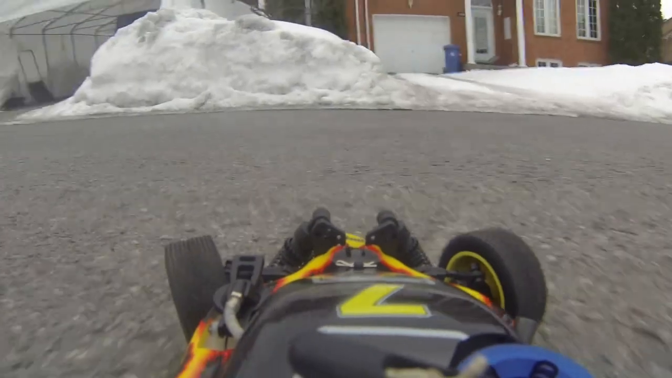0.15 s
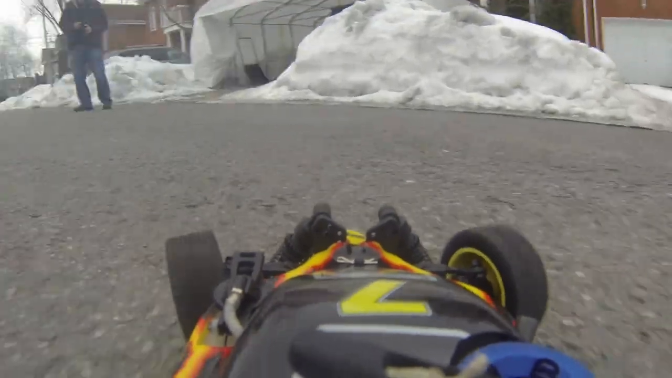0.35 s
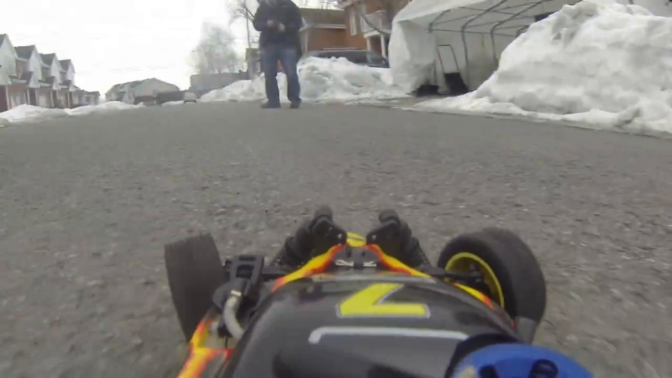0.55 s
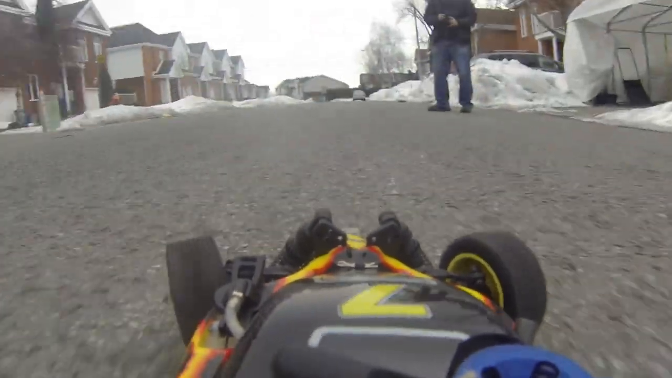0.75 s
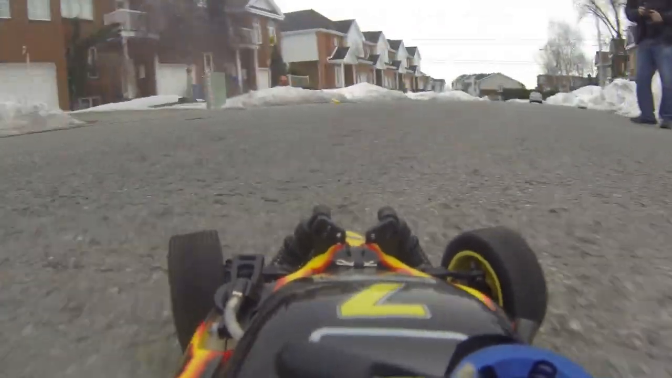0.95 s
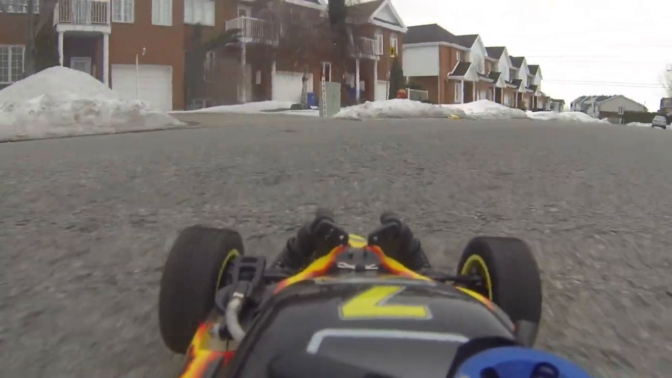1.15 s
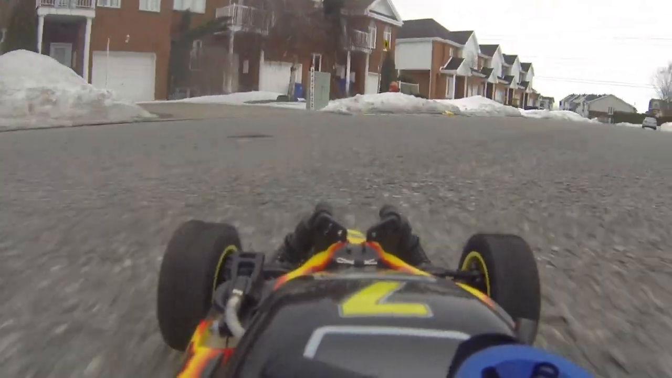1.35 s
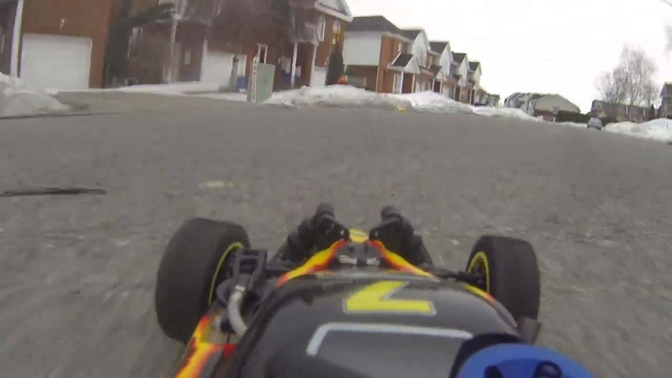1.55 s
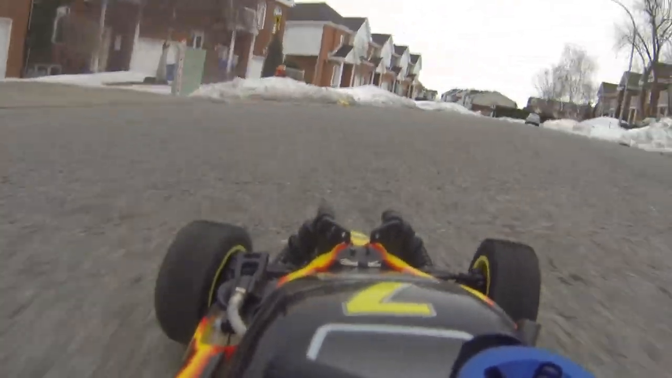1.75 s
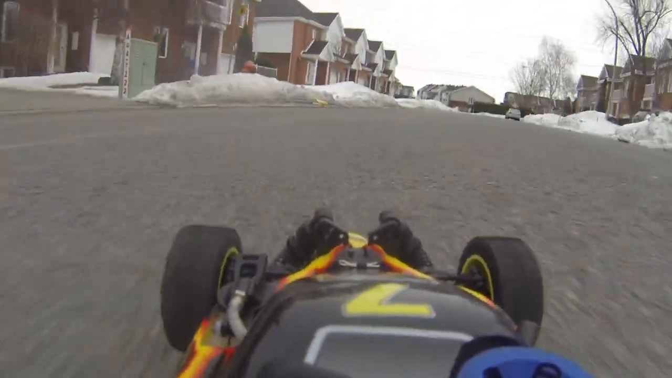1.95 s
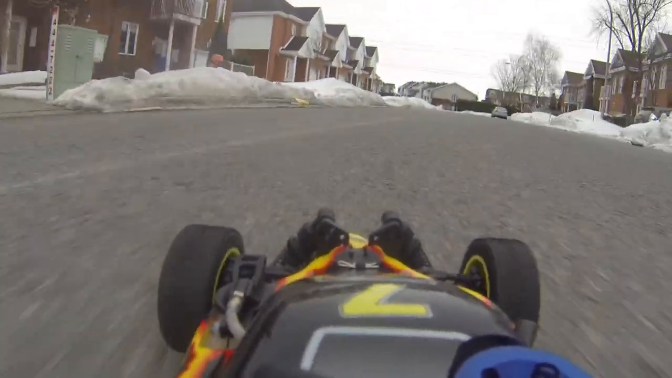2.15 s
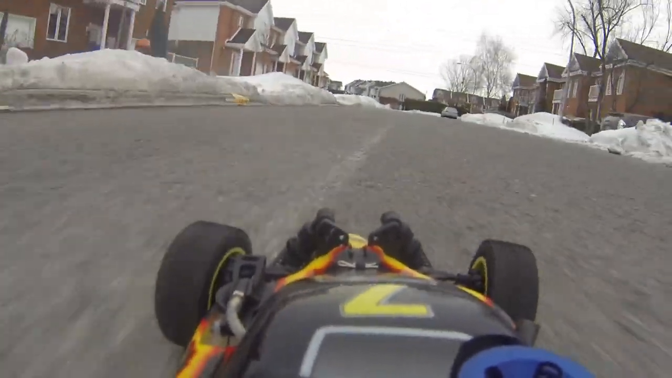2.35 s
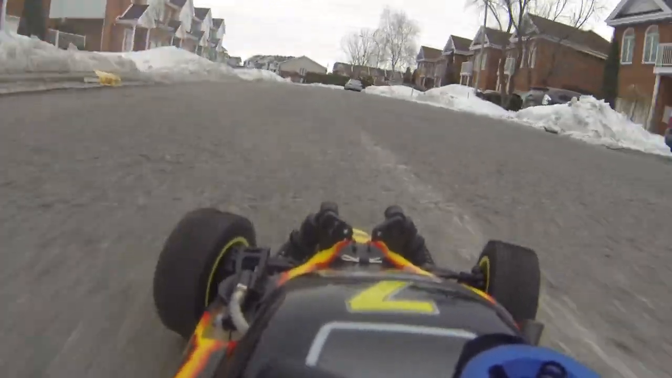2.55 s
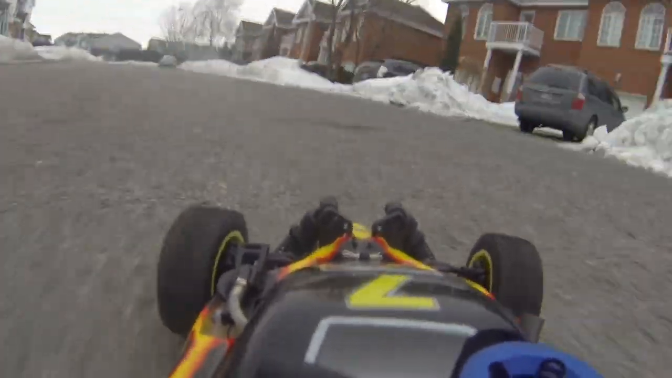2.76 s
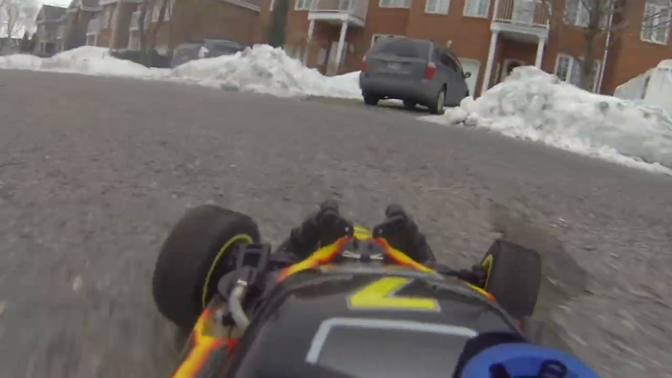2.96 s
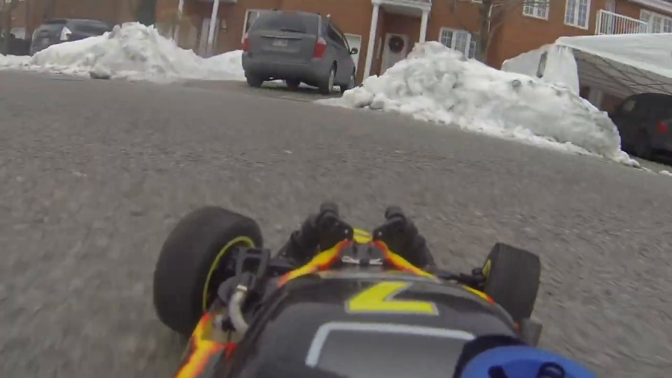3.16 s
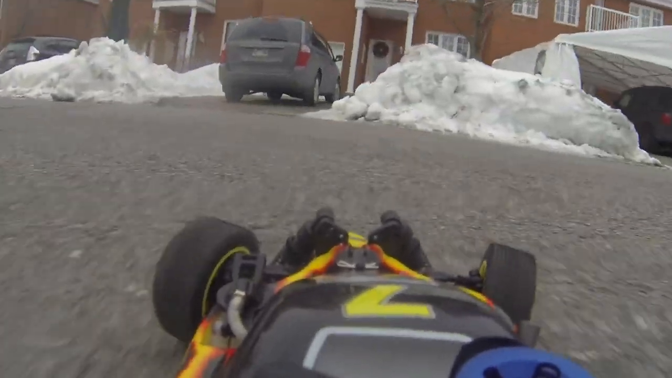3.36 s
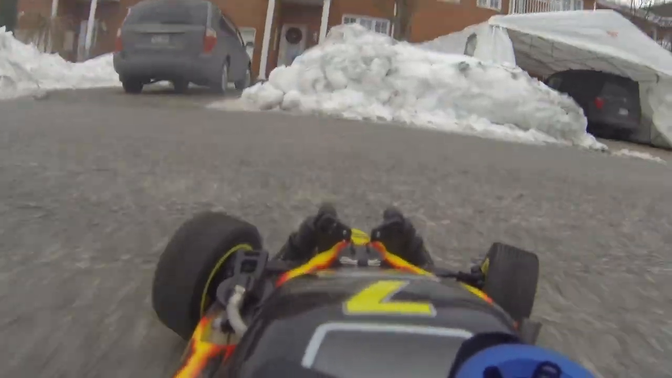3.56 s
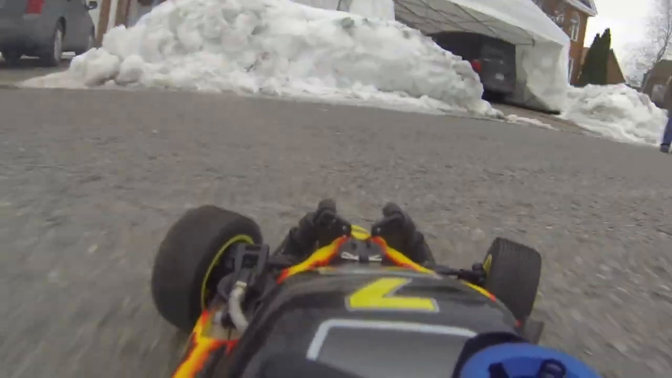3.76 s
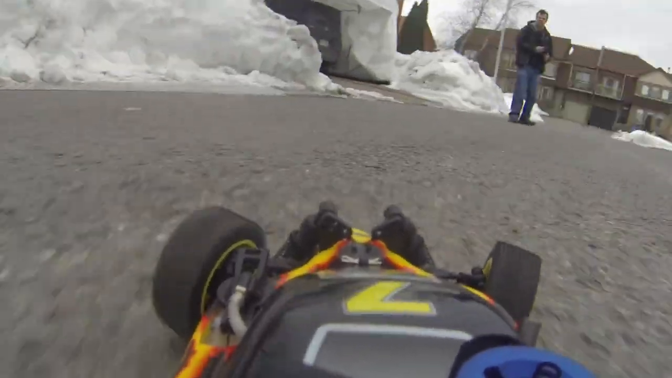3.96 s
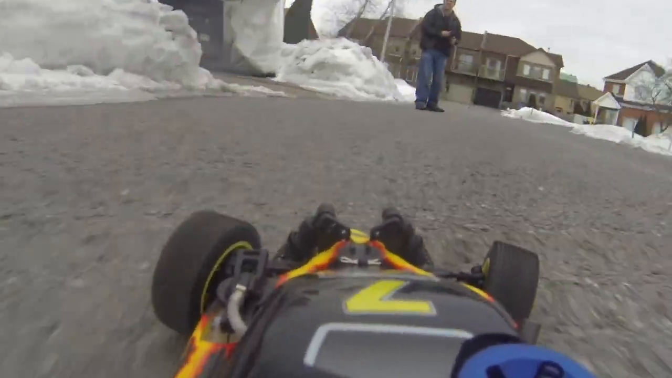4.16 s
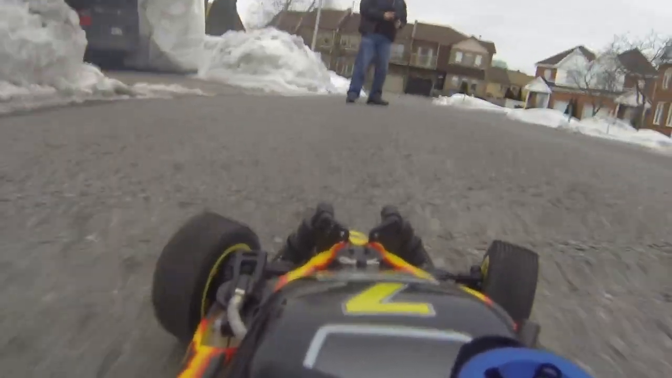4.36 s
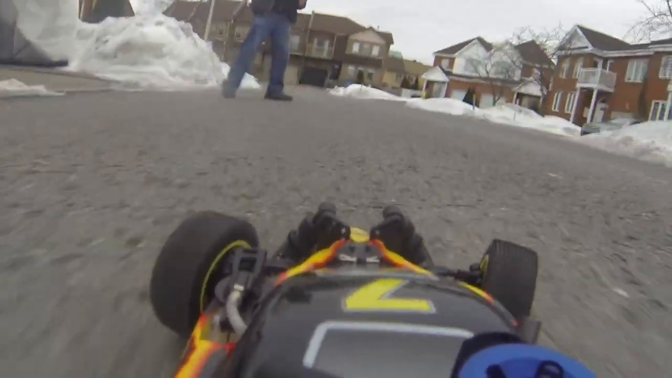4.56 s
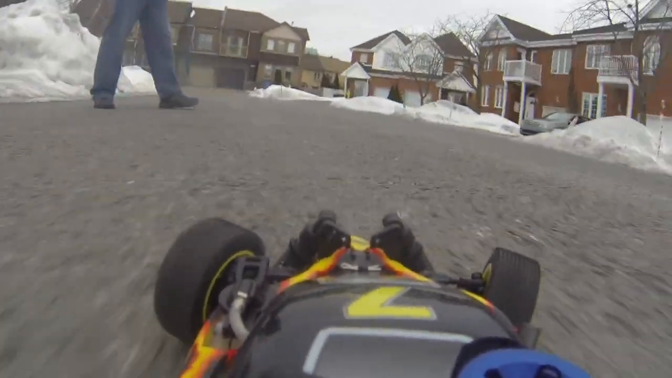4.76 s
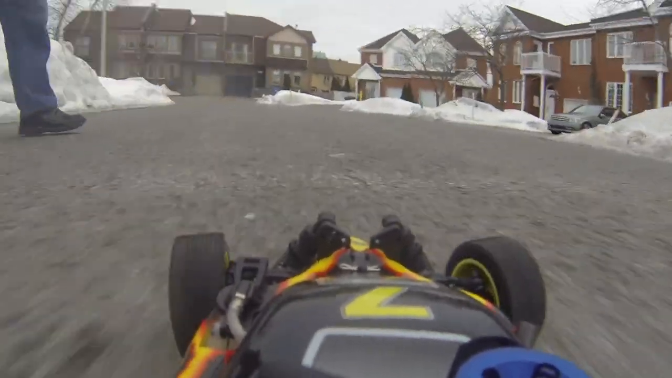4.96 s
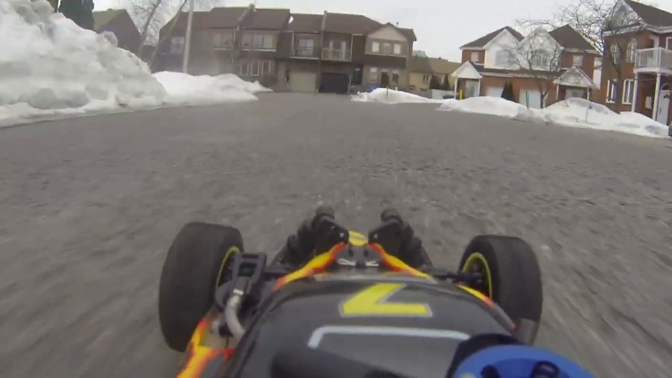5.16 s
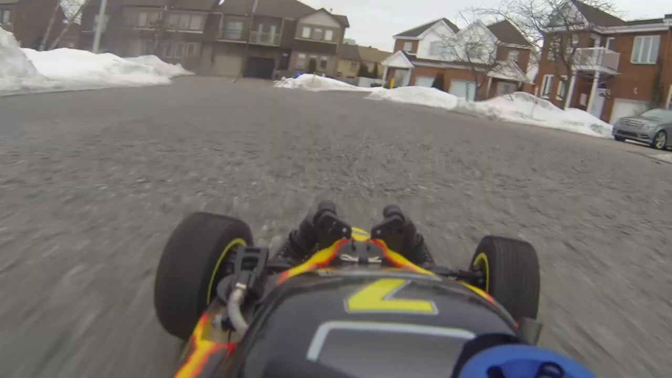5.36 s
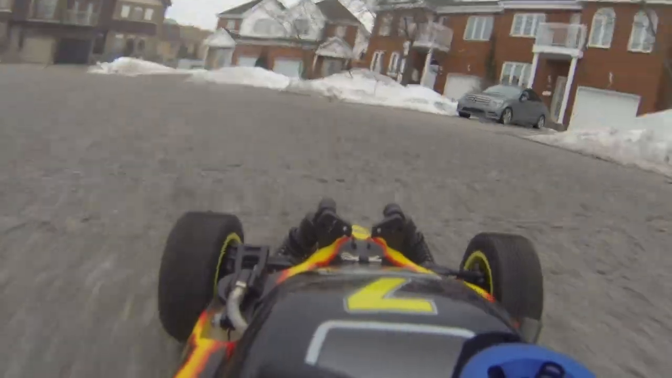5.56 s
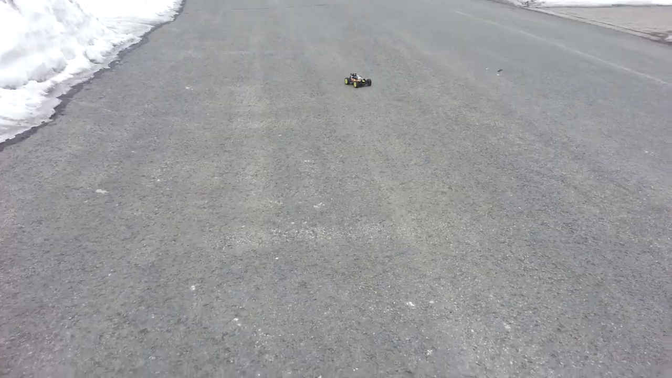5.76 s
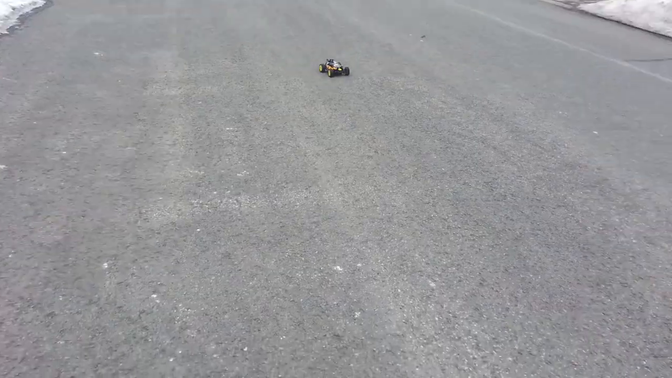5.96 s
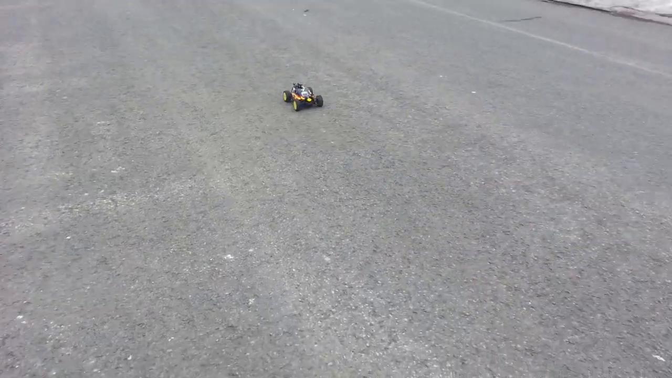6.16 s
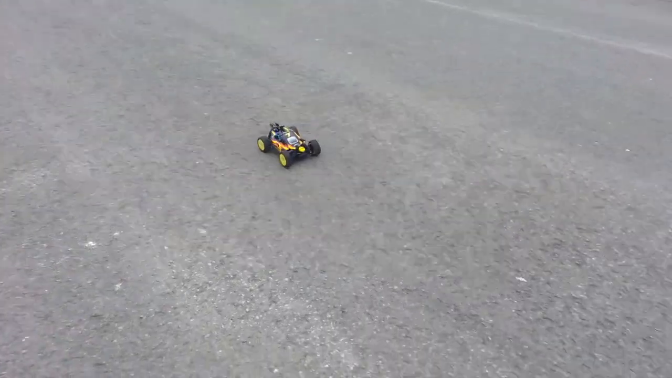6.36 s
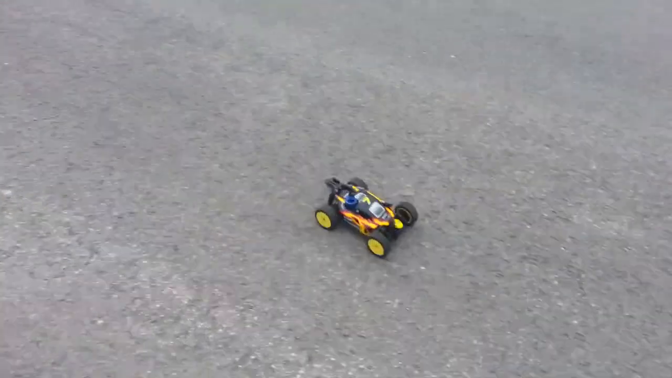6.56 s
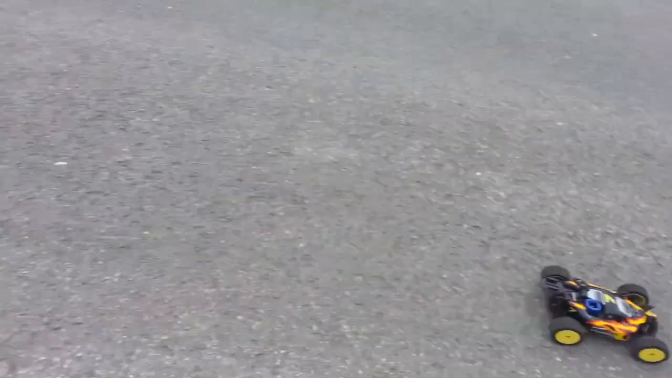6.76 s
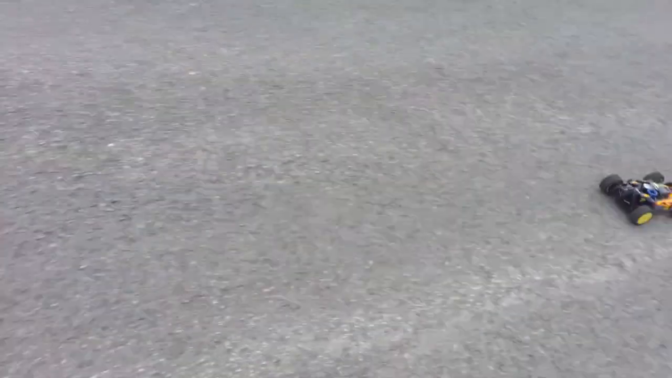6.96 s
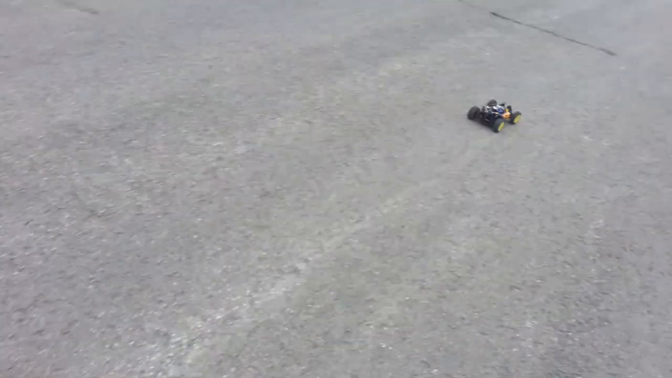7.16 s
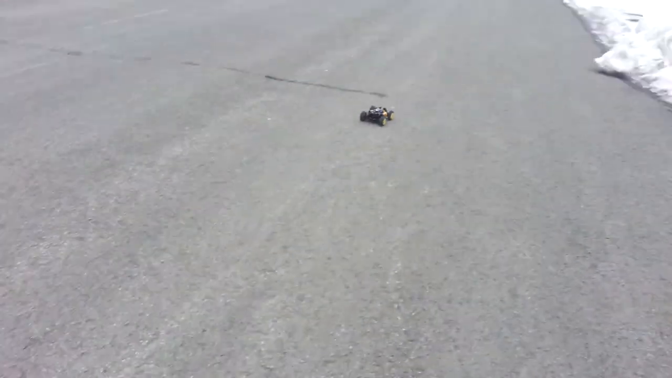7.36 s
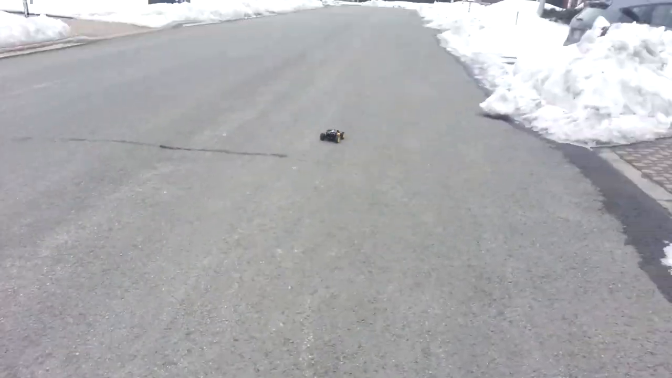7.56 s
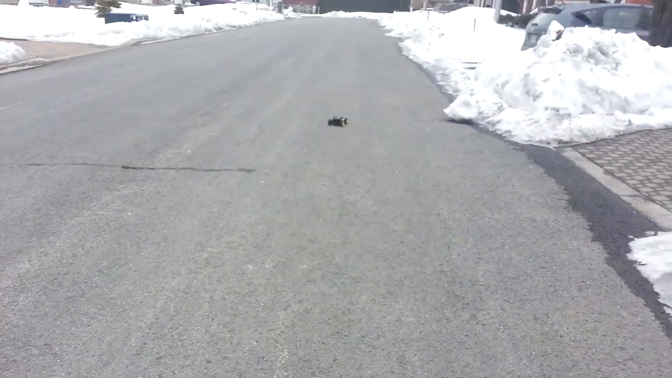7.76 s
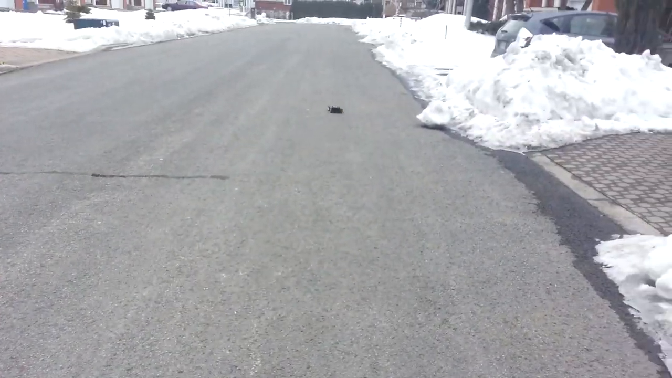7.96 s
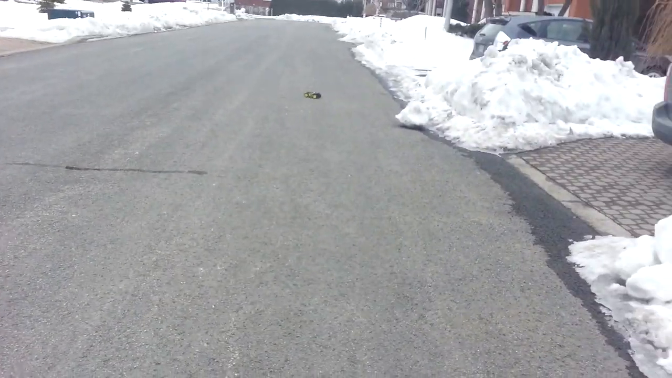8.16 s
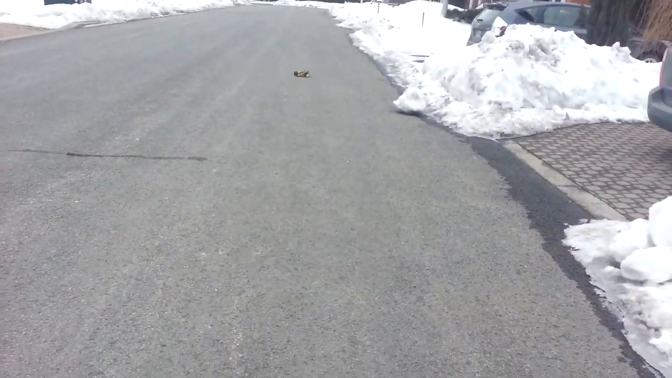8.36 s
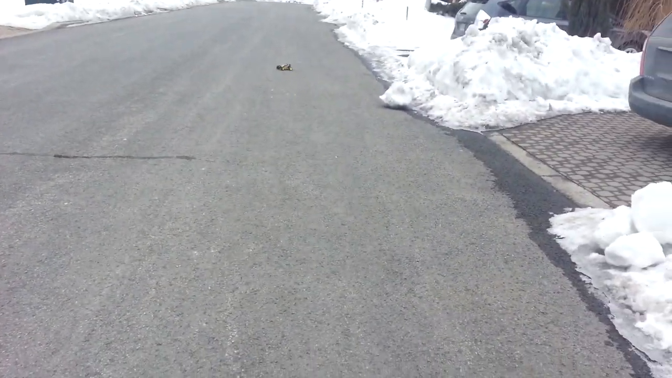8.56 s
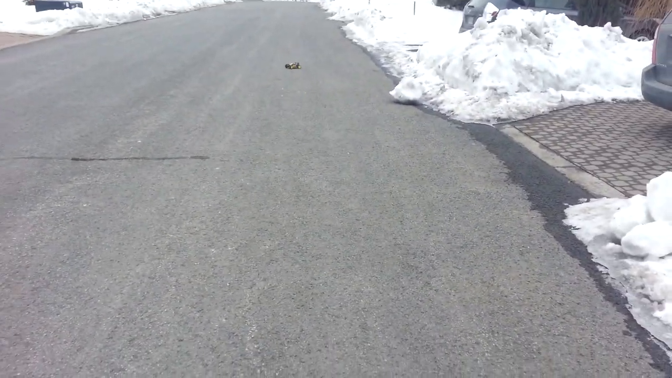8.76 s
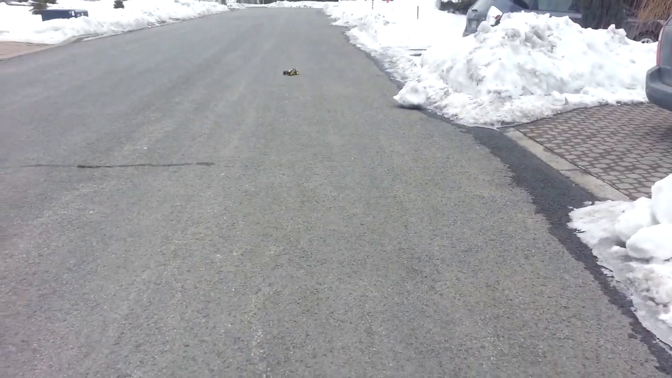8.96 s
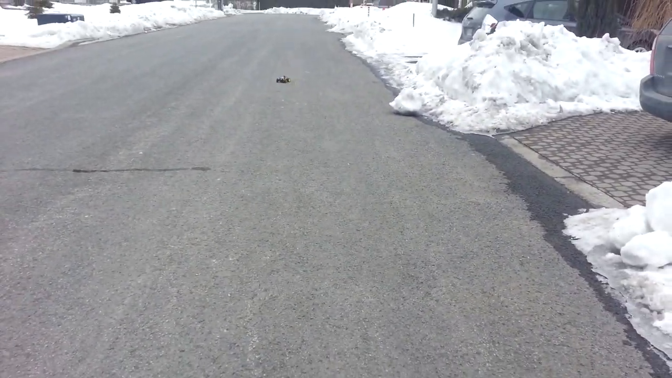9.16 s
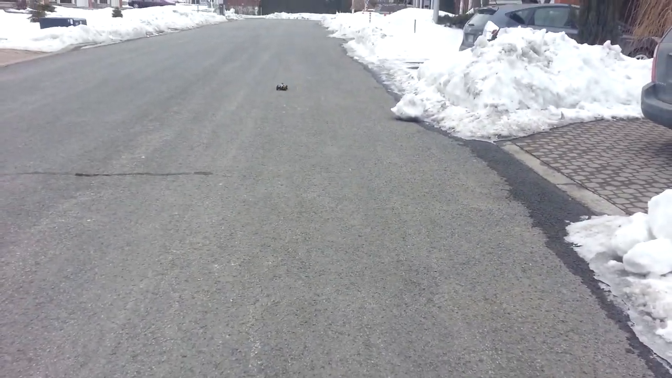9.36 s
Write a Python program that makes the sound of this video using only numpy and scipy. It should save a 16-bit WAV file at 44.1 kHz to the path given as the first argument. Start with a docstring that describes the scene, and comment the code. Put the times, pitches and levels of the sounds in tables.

```python
"""A quiet street, where a small glow-plug model car engine is heard first by a sealed camera bolted to the
chassis, then by a hand-held one at the roadside as the car comes, passes and drives off.
On board, tones locked to the firing rate, filtered pulses and noise make the housing shake, knock and rattle.
From the road, sharp pulses and gated hiss excite the resonances of pipe and shell, a delayed inverted copy
notches them, and low filtered noise makes wind thump the two ports."""
import sys
import numpy as np
from scipy import signal
from scipy.fft import rfft, irfft, next_fast_len
from scipy.io import wavfile
from scipy.ndimage import uniform_filter1d, map_coordinates

SR = 44100
rng = np.random.default_rng(int(sys.argv[2]) if len(sys.argv) > 2 else 0)


def persist_wave(psi):
    """Save psi, clipped to +-1, as 16-bit WAV."""
    counts = np.round(np.clip(psi, -1, 1) * 32767).astype(np.int16)
    wavfile.write(sys.argv[1], SR, np.atleast_2d(counts).T)


def magnitude_from_level(level_db):
    """Linear magnitude for a level in decibels (20 dB per decade)."""
    exponent = np.asarray(level_db, float) / 20
    return 10 ** exponent


N = 414540
T = np.arange(N) / SR

# Engine and chassis on board: t/s, firing rate f/Hz, rattle level/dB (also the measure of load)
RIDE = [(0.0, 225, -32.5), (0.47, 219.2, -37), (0.51, 239.3, -28), (0.56, 238.7, -32.5), (0.6, 216.7, -32),
        (0.67, 219, -27.5), (0.7, 236.7, -32), (0.81, 234.2, -27.5), (0.85, 217, -33.5), (1.11, 221.4, -29),
        (1.15, 237.5, -27.5), (1.38, 234.2, -27.5), (1.61, 298.8, -27.5), (1.95, 372.7, -24.5),
        (2.13, 415, -25.5), (2.3, 431.7, -24), (2.43, 446, -21.5), (2.51, 374, -28.5), (2.64, 322, -28.5),
        (2.84, 278.8, -31), (3.09, 231.5, -31.5), (3.26, 233, -26), (3.45, 261.8, -31.5),
        (3.55, 301.3, -29), (3.66, 251.4, -34), (3.76, 230.9, -35), (4.14, 226.7, -27), (4.22, 263.7, -30),
        (4.33, 292.3, -28.5), (4.44, 285.6, -28.5), (4.6, 341.6, -27.5), (4.76, 378.3, -24.5),
        (4.95, 402, -25.5), (5.26, 369.8, -28), (5.39, 370, -29.5), (5.51, 324, -30), (5.74, 271.3, -32.5)]
# Outline of the housing's response: f/Hz, relative level/dB
HOUSING = [(300, -31.5), (480, -12.5), (800, -16.5), (970, -10), (1500, -2.5), (2240, -11), (2700, -7.5),
           (3450, -18), (4300, -26), (5300, -26), (6100, -36.5), (8000, -42), (9000, -52), (12000, -53),
           (15000, -81)]
# Housing resonances in knock and rattle: f/Hz, width/Hz, level/dB above the outline
HOUSING_MODES = [(596, 45, -2), (991, 43, 8), (1325, 26, 4.5), (1530, 72, 5), (2774, 69, 2),
                 (3778, 83, 10.5), (5200, 55, 6)]
# Housing resonances that let a tone through: f/Hz, width/Hz, level/dB
TONE_MODES = [(678, 40, -14.5), (985, 75, -5), (1291, 185, 0), (1496, 170, -10.5), (1900, 140, -9.5)]
# Outline of the road rumble: f/Hz, relative level/dB
RUMBLE = [(20, 5), (33, 0.5), (60, -2.5), (110, -4), (200, -7), (340, 4), (420, -19), (700, -54.5)]
# Tones on a housing resonance: level/dB for 2, 3, 4 and 5 times the firing rate, then for the gears
TONE_LEVELS = (-39.5, -30, -29, -33, -26.5)
# Engine from the road: t/s, firing rate f/Hz, relative level/dB
PASS = [(5.76, 317, -21), (6.11, 340.1, -21), (6.22, 336.8, -20), (6.5, 347.3, -20), (6.7, 355.1, -20),
        (6.78, 356.8, -20), (6.82, 355.9, -21), (7.02, 362.1, -22.5), (7.88, 387.1, -24.5),
        (7.92, 380.6, -30), (7.96, 349, -30.5), (8.04, 315.7, -32), (8.2, 236.8, -28.5), (8.28, 214.8, -26),
        (8.42, 216.5, -29), (8.76, 214.2, -30), (8.81, 234.4, -29), (8.83, 238, -26.5), (8.88, 230.9, -28),
        (8.96, 235.3, -29.5), (9.01, 212.9, -31.5), (9.24, 215.6, -30), (9.33, 237.4, -27.5),
        (9.4, 235.3, -24.5)]
# Overtones that stand clear of the rasp: start t/s, length/s, multiple of the firing rate, relative level/dB
SINGING = [(5.759, 0.95, 6, -38), (5.717, .72, 11, -35), (6.11, .45, 12, -36), (6.258, 0.41, 1, -31.5),
           (6.3, 0.63, 15, -52), (6.578, 0.18, 10, -21), (6.536, 0.2384, 12, -26), (5.72, .6, 10, -31.5),
           (8.765, 0.25, 17, -35), (9.27, .2, 15, -36.5), (6.59, 0.55, 14, -27.5), (6.598, 0.47, 13, -22.5),
           (6.66, 0.083, 15, -46), (6.896, .28, 17, -33), (6.9, 0.26, 16, -32.5), (7.452, .48, 12, -43),
           (7.339, 0.66, 13, -38.5), (7.91, 0.46, 4, -42), (7.904, 0.46, 6, -44), (7.05, 0.2, 1, -51),
           (7.165, 0.74, 6, -35), (7.53, 0.444, 9, -29.5), (8.305, 0.53, 3, -40), (8.77, 0.25, 8, -33),
           (8.976, 0.38, 3, -35.5), (9.272, 0.24, 8, -32)]
# Way the car faces: t/s, side (0 nose on, 1 shoulder, 2 flank, 3 quarter, 4 tail on, 5 far down the street)
HEADING = [(5.75, 0), (6.27, .15), (6.48, 1), (6.6, 1), (6.72, 2), (7.12, 2), (7.24, 3), (7.4, 3.2),
           (7.55, 4), (7.9, 4), (8.2, 5), (9.4, 5)]
# Outlines of what the pipe radiates to each side: f/Hz, relative level/dB
NOSE = [(120, -46), (200, -13.5), (332, -5), (581, -23.5), (659, -6), (734, -17.5), (980, -7.5), (1780, -9),
        (1980, -8.5), (2750, -14), (3670, -1.5), (5660, -24.5), (10100, -20), (15000, -41)]
SHOULDER = [(120, -44.5), (200, -21), (344, -3.5), (419, -17.5), (696, -14.5), (946, -5.5), (1020, -10),
            (1110, -10), (1430, -12), (1600, -17), (2130, -12.5), (2550, -19), (6420, -12.5),
            (15000, -36.5)]
FLANK = [(120, -48), (200, -28), (357, -4), (467, -9.5), (708, -12), (980, -7), (1070, -8), (1330, -10),
         (1410, -8.5), (1540, -12.5), (3060, -9.5), (5070, -8), (5450, -11), (15000, -19)]
QUARTER = [(120, -62), (200, -27), (332, -21), (363, -3), (435, -24.5), (671, -18), (721, -12.5),
           (1170, -9.5), (1490, -6.5), (1980, -12), (2210, -8.5), (2800, -18), (8120, -11.5), (15000, -29)]
TAIL = [(200, -38), (370, -5.5), (750, -9.5), (1300, -8), (2300, -7.5), (3600, -8.5), (5000, -18),
        (7000, -18.5), (10500, -15.5), (15000, -26)]
FAR = [(130, -34.5), (220, -27.5), (450, -5.5), (1000, -17), (1800, -8.5), (3500, -11), (5000, -7.5),
       (7500, -17.5), (10500, -27), (13000, -54.5)]
# Resonances of pipe and shell, one list for each side in order: f/Hz, width/Hz, level/dB above the outline
RINGS = [
    [(1950, 640, 4.5), (2680, 240, -1.5), (3740, 520, 1), (5800, 900, 6), (8450, 620, 4)],
    [(2680, 500, -5), (4160, 1100, -2.5), (5600, 500, -12.5), (6600, 810, 3), (8600, 780, 5)],
    [(2340, 530, -6.5), (5060, 720, 7), (6400, 830, 2), (7600, 750, -5.5)],
    [(1770, 670, 3), (3020, 530, 4), (6540, 1100, -8.5), (8100, 1100, 2.5), (11100, 780, 7)],
    [(1520, 470, 0.5), (2350, 380, 4), (3467, 330, 0), (4645, 538, 13), (5800, 730, -3), (6540, 1200, 10)],
    [(1145, 520, 14), (1790, 140, 13.5), (2530, 320, -7.5), (3334, 210, 14.5), (3929, 110, 14),
     (5420, 520, -11.5), (10317, 1000, 11)],
]
# Close echo of opposite sign: t/s, nominal lag/ms, share of the direct sound (0-1)
ROAD_ECHO = [(5.75, 0.28, 0.05), (6.4, 0.47, 0.2), (6.6, 0.3, 0.1), (6.75, 0.3, 0.19), (7.0, 0.23, 0.22),
             (7.12, .26, 0.1), (7.3, 0.307, 0.1), (7.45, 0.31, 0.35), (7.7, 0.34, 0.49), (8.0, 0.318, 0.05),
             (9.4, 0.44, 0)]
# Contrast of the two ports, used about its mean: f/Hz, left minus right level/dB
PORTS = [(60, -10), (110, -18.5), (200, 23), (380, 6.5), (700, 8.5), (1290, 8), (2380, 12), (4400, 2.5),
         (8120, 5), (15000, 3)]
# Wind thumps: onset t/s, relative peak level/dB, left minus right level/dB
THUMPS = [(6.022, -36, 43), (6.055, -47, 19), (6.178, -30, 7), (6.219, -44, 3), (6.301, -21, 0),
          (6.32, -29, 9), (6.367, -27, -3.5), (6.458, -19.5, -2), (6.481, -27, -2), (6.633, -18, -0.4),
          (6.702, -20.5, 2), (6.771, -24, 0), (6.805, -28, 11), (6.93, -39, -2), (7.13, -32.5, 27),
          (7.175, -36, 26), (7.276, -34, 23), (7.52, -35, 3), (8.061, -29, 9), (8.288, -35, 24),
          (8.313, -37, 29), (8.619, -35.5, 24), (8.754, -35, 27), (8.804, -40.5, 32), (8.985, -28, 3),
          (9.025, -33, 18)]
# Soft, changing breeze: t/s, relative level/dB
BREEZE = [(5.75, -42), (6.55, -34.5), (6.8, -43), (7.39, -52), (7.65, -72), (7.88, -46), (8.03, -44),
          (8.4, -48.5), (8.68, -48.5), (8.95, -51), (9.4, -50)]
# Outline of the wind noise: f/Hz, relative level/dB
WIND = [(30, -19.5), (60, -11.5), (110, -2.5), (200, 0.5), (400, -5.5), (600, -10), (1200, -25.5),
        (4000, -95)]
# Narrow band of noise near 14.4 kHz: start t/s, length/s, relative level/dB
TREBLE_BAND = (6.66, 1.27, -48)

VIEW_CHANGE_S = 5.745  # from the chassis to the roadside
IDLE_HZ, GEAR_RATIO = 225, 3.4
DIP_EVERY_S = .256
CEILING = .74  # limit of the roadside waveform before its faint treble is gated


def columns(table):
    """Linear interpolation turns every column after time into a curve over all samples."""
    s, *rest = np.transpose(table)
    return [np.interp(T, s, c) for c in rest]


def unit(x):
    """Normalisation of signal power: scale to rms 1."""
    return x / np.sqrt(np.mean(x ** 2))


def resonance(f, centre, width):
    """Resonance principle: a response of 1 at the centre that falls to half at half a width away."""
    return 1 / (1 + (2 * (f - centre) / width) ** 2)


def colour(x, points, modes=()):
    """Minimum-phase filtering: a causal response with the given (Hz, dB) outline and resonances on top."""
    f = np.linspace(1, SR / 2, 4097)
    hz, db = np.transpose(points)
    db = np.interp(np.log(f), np.log(hz), db)
    for centre, width, peak_db in modes:
        db = db + peak_db * resonance(f, centre, width)
    # folding the cepstrum forward in time makes the response causal
    cepstrum = irfft(np.log(magnitude_from_level(db)))
    cepstrum[1:4096] *= 2
    cepstrum[4097:] = 0
    response = irfft(np.exp(rfft(cepstrum)))[:2048]
    return signal.oaconvolve(x, response)[:N]


def walk(rate):
    """Band-limited fluctuation: random levels held 1 / rate s and slewed twice; spread near 1."""
    k = max(int(SR / rate), 2)
    held = np.repeat(rng.standard_normal(N // k + 1), k)
    return 1.3 * uniform_filter1d(uniform_filter1d(held, k), k)[:N]


def fire(turns, scatter_db, skip_db, late):
    """Impulsive excitation: one pulse a turn, sizes and timing scattered, odd firings offset by skip_db."""
    whole = np.arange(1, int(turns[-1]))
    chance = rng.standard_normal((N // 50, 2))[:len(whole)].T
    at = np.interp(whole + late * chance[0], turns, np.arange(N))  # late: spread in turns
    scatter_db = np.interp(whole, turns, scatter_db + 0 * turns)
    skip_db = np.interp(whole, turns, skip_db + 0 * turns)
    size = magnitude_from_level(scatter_db * chance[1] + skip_db * (whole % 2))
    # a windowed sinc places each pulse between samples
    taps = np.floor(at).astype(int)[:, None] + np.arange(-7, 9)
    gap = taps - at[:, None]
    shape = np.sinc(gap) * np.cos(np.pi * gap / 16) ** 2
    pulses = np.zeros(N + 16)
    np.add.at(pulses, np.clip(taps, 0, N + 15), size[:, None] * shape)
    puff = np.interp(turns, whole, size)
    return pulses[:N], puff


def chassis_shake(hz, turns, lumpy):
    """Forced vibration: the housing shakes once a turn, most where the firing rate meets the mount resonance."""
    shake_db = -20 + 8.37 * resonance(hz, 307, 92.6)
    unevenness_db = lumpy * (0.99 * walk(30) + 0.84 * walk(120))
    return np.sqrt(2) * np.sin(2 * np.pi * turns) * magnitude_from_level(shake_db + unevenness_db)


def half_order(hz, turns):
    """Subharmonic vibration: every second turn shakes a little harder, more so at speed."""
    return np.sin(np.pi * turns) * magnitude_from_level(-44 + 1.3 * np.log2(hz / 300) + 4.9 * walk(14.0))


def tone_gain(f, load):
    """Resonant transmission: a tone sings out while it crosses a housing resonance, louder under load."""
    return load * sum(magnitude_from_level(db) * resonance(f, centre, width) for centre, width, db in TONE_MODES)


def housing_overtones(hz, turns, load):
    """Harmonic excitation: multiples of the firing rate sound through the housing's resonances."""
    second = np.sin(4 * np.pi * turns + 1) * magnitude_from_level(-35.5) * resonance(2 * hz, 600, 140)
    overtone = second * magnitude_from_level(3.9 * walk(17))
    for k, db in zip((2, 3, 4, 5), TONE_LEVELS[:-1]):
        tone = np.sin(2 * np.pi * k * turns)
        overtone = overtone + tone * tone_gain(k * hz, load) * magnitude_from_level(db + 2.8 * walk(14))
    return overtone


def gears(hz, load):
    """Gear meshing: a tone at a fixed ratio to the firing rate, and its octave, cross the housing resonances."""
    mesh = 2 * np.pi * GEAR_RATIO * np.cumsum(hz * (1 + 0.00375 * walk(30))) / SR
    whine = np.sin(mesh) + magnitude_from_level(-10.0) * np.sin(2 * mesh)
    return whine * tone_gain(GEAR_RATIO * hz, load) * magnitude_from_level(TONE_LEVELS[-1] + 2.2 * walk(40))


def knock(pulses, load):
    """Impulse response: each firing strikes the housing and excites its modes."""
    return unit(colour(pulses, HOUSING, HOUSING_MODES)) * load * magnitude_from_level(-35)


def rattle(hz, turns, puff, rattle_db, lumpy):
    """Amplitude modulation: noise gated by each firing chatters through the housing's modes."""
    gate = 0.75 + puff * np.exp(-(turns % 1) / 0.48)
    noise = unit(colour(gate * rng.standard_normal(N), HOUSING, HOUSING_MODES))
    # low and high parts of the housing chatter each in their own time
    low = signal.sosfilt(signal.butter(2, 2100, fs=SR, output="sos"), noise)
    high = noise - low
    burst_db = 1.0 + 1.2 * lumpy
    low = low * magnitude_from_level(burst_db * walk(18))
    high = high * magnitude_from_level(burst_db * walk(11) + 0.83 * np.log2(hz / 300))
    return (low + high) * magnitude_from_level(rattle_db + 1.09 * walk(90) + 0.91 * lumpy * walk(7.7))


def road_rumble(hz, rattle_db):
    """Structure-borne noise: the lower the firing rate, the more the road thuds through."""
    rumble_db = -34.5 + .2 * (rattle_db + 32.5) - 2.7 * np.log2(hz / 300)
    rumble_db = rumble_db + 1.1 * walk(3.4) + 0.69 * walk(12)
    return unit(colour(rng.standard_normal(N), RUMBLE)) * magnitude_from_level(rumble_db)


def gain_control(x):
    """Dynamic range compression: the camera on board follows loudness and turns down what exceeds a threshold."""
    threshold_db, ratio = -19, 6.2
    attack_s, release_s = 0.018, 0.1
    step = SR // 1000  # about 1 ms
    power = uniform_filter1d(x ** 2, size=441)[::step]
    heard, e = [], power[0]
    for p in power:
        e += (p - e) * min(step / SR / (attack_s if p > e else release_s), 1)
        heard.append(e)
    over_db = np.maximum(10 * np.log10(heard) - threshold_db, 0)
    over_db = np.interp(np.arange(N), np.arange(len(power)) * step, over_db)
    return x * magnitude_from_level(-over_db * (1 - 1 / max(ratio, 1)))


def on_board():
    """Structure-borne sound: engine, gears and road reach the sealed camera through the chassis."""
    hz, rattle_db = columns(RIDE)
    lumpy = np.clip((IDLE_HZ / hz) ** 3, 0, 1)  # the slower, the more unevenly it runs
    load = magnitude_from_level(.5 * (rattle_db + 27))
    turns = np.cumsum(hz * (1 + .006 * lumpy * walk(45))) / SR
    pulses, puff = fire(turns, scatter_db=1.5, skip_db=-1.5, late=.008)
    mix = chassis_shake(hz, turns, lumpy) + half_order(hz, turns)
    mix = mix + housing_overtones(hz, turns, load) + gears(hz, load)
    mix = mix + knock(pulses, load) + rattle(hz, turns, puff, rattle_db, lumpy)
    mix = mix + road_rumble(hz, rattle_db)
    return gain_control(mix) * magnitude_from_level(np.array([[3.1], [-4.6]]))  # left, right


def exhaust_bang(pulses, hz):
    """Dispersion: the bang is dull, and leaves the pipe with its treble a little later than its bass."""
    dull = colour(pulses, [(4200, 0), (7000, -6), (12000, -11)])
    size = next_fast_len(N)
    f = np.fft.rfftfreq(size, 1 / SR)
    smear = np.exp(-1j * np.pi * 0.0013 * f ** 2 / 8000)  # delays 8 kHz by 1.3 ms
    bang = irfft(rfft(dull, size) * smear, size)[:N]
    return unit(bang) * np.sqrt(hz / 300)


def gas_hiss(turns, puff):
    """Jet noise: gas puffs modulate bright noise, one part for both ports and one for each."""
    gate = 3.4 + puff * np.exp(-(turns % 1) / 3.3)
    bright = [(300, -7), (2200, -3), (4500, -1), (7000, 0)]
    shared, *own = (unit(colour(gate * rng.standard_normal(N), bright)) for _ in range(3))
    return [.7 * shared + .7 * hiss for hiss in own]


def radiate(source, heading):
    """Directivity: the side of the car that faces the listener sets the outline and resonances heard."""
    car = 0
    for k, face in enumerate((NOSE, SHOULDER, FLANK, QUARTER, TAIL, FAR)):
        facing = np.clip(1 - abs(heading - k), 0, 1) ** 0.7
        car = car + facing * unit(colour(source, face, RINGS[k]))
    return car


def close_echo(car, stretch):
    """Comb filtering: a close echo of opposite sign notches the direct sound."""
    lag_ms, share = columns(ROAD_ECHO)
    echo_at = np.arange(N) - stretch * lag_ms * SR / 1000
    return car - np.clip(share, 0, .9) * map_coordinates(car, [echo_at], order=3)


def swell(s, length):
    """Amplitude envelope: 0 to 1 and back, with soft ends 0.08 s long."""
    return np.clip(np.minimum(T - s, s + length - T) / .08, 0, 1) ** 2


def singing_overtones(hz, turns, level_db):
    """Harmonic series: the firing tone and a few overtones stand out clear of the rasp."""
    drone = np.sin(2 * np.pi * turns - .6) * magnitude_from_level(level_db - 15 + 1.5 * walk(40))
    waver_db = 2.6 * walk(40) + 2 * walk(150)
    for k in {round(row[2]) for row in SINGING}:
        size = sum(swell(s, length) * magnitude_from_level(db) for s, length, multiple, db in SINGING if round(multiple) == k)
        waver = magnitude_from_level(np.roll(waver_db, 999 * k) * (hz / 360) ** 2)  # steadier when slow
        drone = drone + np.sin(2 * np.pi * k * turns - .6) * size * waver
    return drone * magnitude_from_level(np.array([[3.0], [-2.5]]))  # left, right


def passing():
    """Source, path and receiver: bangs and hiss are shaped by the car's side, a close echo and the two ports."""
    hz, level_db = columns(PASS)
    closeness = np.exp(-((T - 6.4) / 0.9) ** 2)  # broad swell about 6.4 s, 0-1
    lift = np.clip(-uniform_filter1d(np.gradient(hz), size=2205) * SR / 500, 0, 1)  # revs falling, 0-1
    heading = np.clip(columns(HEADING)[0] + .15 * walk(14), 0, 5)  # the colour wavers at random
    pan_db = 4.5 + 0.5 * closeness  # left minus right
    # hiss beside the bangs: more in the swell, more while the revs fall and more per octave of revs
    gas_db = -1 + 1.8 * closeness + 3 * lift + 2 * np.log2(hz / 300)
    turns = np.cumsum(hz * (1 + .0012 * walk(30) + .011 * lift * walk(60))) / SR  # ragged off throttle
    # the faster it runs, the more unevenly it fires
    skip_db = -.016 * (hz - 170) * (1 + .8 * walk(12))
    pulses, puff = fire(turns, scatter_db=.008 * (hz - 110), skip_db=skip_db, late=.006)
    bang = exhaust_bang(pulses, hz)
    hz_port, db_port = np.transpose(PORTS)
    out = []
    # each port has its own path for the echo and its own share of the hiss
    for side, hiss, stretch in zip((1, -1), gas_hiss(turns, puff), (1.06, .98)):
        car = radiate(bang + magnitude_from_level(gas_db) * hiss, heading)
        car = close_echo(car, stretch)
        car = colour(car, np.transpose([hz_port, side * (db_port - db_port.mean()) / 2]))
        out.append(car * magnitude_from_level(level_db + side * pan_db / 2))
    return -(np.array(out) + singing_overtones(hz, turns, level_db))


def wind():
    """Turbulent pressure: a soft, changing breeze and sudden thumps strike the two ports, only partly alike."""
    size = np.ones((2, 1)) * magnitude_from_level(columns(BREEZE)[0] + 6 + 3 * walk(25))
    age = np.arange(SR // 10) / SR / .033
    shape = age * np.exp(1 - age * 3) * 8  # peaks 11 ms after the onset
    for s, peak_db, pan_db in THUMPS:
        at = int(s * SR)
        port_db = np.array([[pan_db], [-pan_db]]) / 2
        size[:, at:at + len(age)] += shape * magnitude_from_level(peak_db - 9 + port_db)
    shared, *own = (unit(colour(rng.standard_normal(N), WIND)) for _ in range(3))
    return size * (0.44 * shared + 0.29 * np.array(own))


def treble_band():
    """Band-pass filtering: noise confined to a narrow band near 14.4 kHz flickers in level."""
    band = colour(rng.standard_normal(N), [(13900, -65), (14300, -19), (14500, -14), (14800, -72)])
    s, length, db = TREBLE_BAND
    flicker = magnitude_from_level(db + 5.1 * walk(7) + 2 * walk(30))
    return unit(band) * swell(s, length) * flicker * magnitude_from_level(np.array([[1.5], [-1.5]]))


def dips():
    """Periodic gating: the level dips to a fifth at a steady beat and recovers within milliseconds."""
    age = (T - VIEW_CHANGE_S) % DIP_EVERY_S
    fade_out = np.clip((DIP_EVERY_S - age) / .001, .2, 1)
    fade_in = 1 - .8 * np.exp(-age / .006)
    return np.minimum(fade_in, fade_out)


def treble_holes(x, from_hz, floor_db, rise_db):
    """Spectral gating: faint treble cells under a threshold that rises with pitch fall silent."""
    f, _, cells = signal.stft(x, SR, nperseg=1024)
    strength = np.sqrt(uniform_filter1d(np.abs(cells) ** 2, size=7, axis=1))
    # chance shifts the strength in groups of seven bins
    chance = np.repeat(rng.standard_normal((80, cells.shape[2])), 7, axis=0)[:len(f)]
    strength = strength * magnitude_from_level(9.5 * chance)
    limit = magnitude_from_level(floor_db + rise_db * np.log2(np.maximum(f, 1) / from_hz))[:, None]
    keep = (strength.mean(axis=0) > limit) | (f[:, None] < from_hz / 1.3)
    keep = keep * (f[:, None] < 14800)
    return signal.istft(cells * keep, SR, nperseg=1024)[1][:, :N]


def scene():
    """Superposition and saturation: the chassis gives way to the road, where the loudest bangs are rounded off."""
    car = np.clip((VIEW_CHANGE_S - T) / 0.0046, 0, 1)
    road = np.clip((T - VIEW_CHANGE_S) / 0.0016, 0, 1)
    street = passing() + wind() + treble_band()
    street = CEILING * np.tanh(street / CEILING * 1.128)
    street = treble_holes(street, from_hz=10500, floor_db=-67, rise_db=17)  # rise in dB per octave
    return car * on_board() + road * dips() * street


def low_pass(x):
    """Removes everything above the highest recorded frequency."""
    return signal.sosfilt(signal.butter(12, 16410, fs=SR, output="sos"), x)


def record(dry):
    """Signal chain: the finished mix goes through its last stage."""
    return low_pass(dry)


dry = scene()
out = record(dry)
persist_wave(out)
```